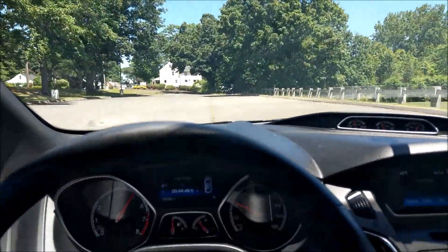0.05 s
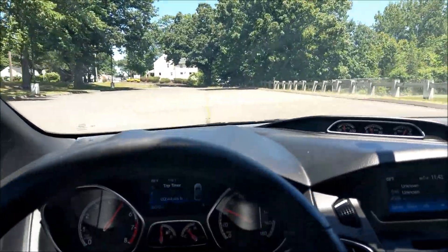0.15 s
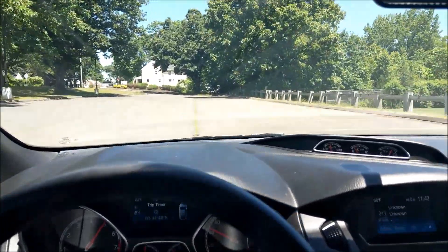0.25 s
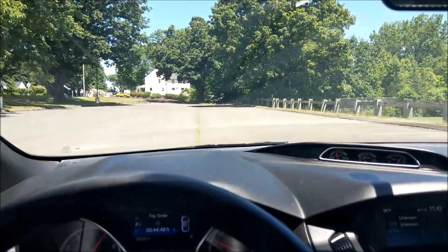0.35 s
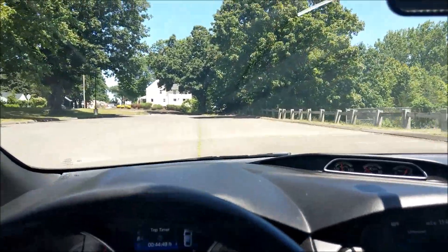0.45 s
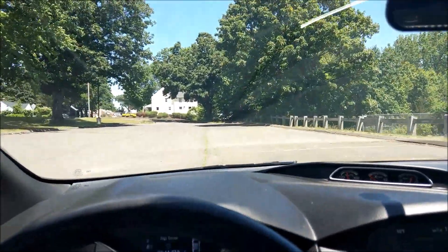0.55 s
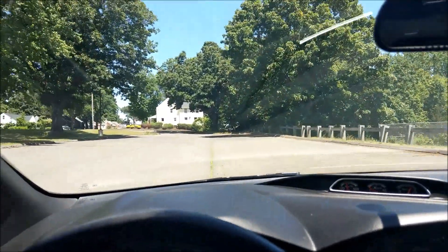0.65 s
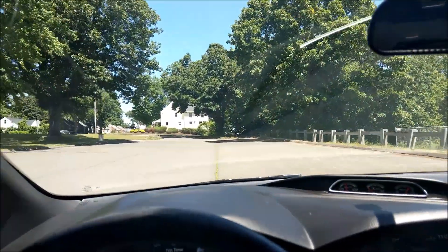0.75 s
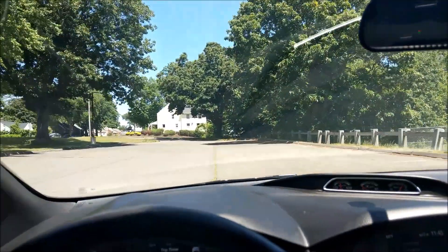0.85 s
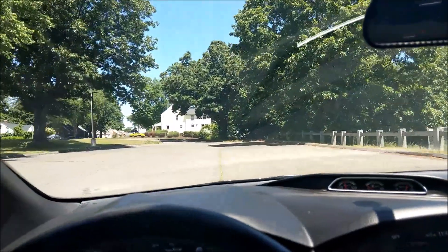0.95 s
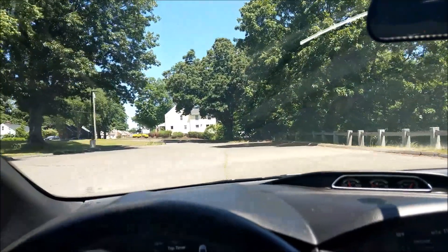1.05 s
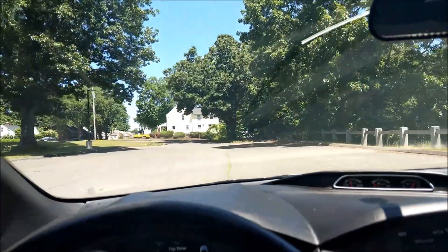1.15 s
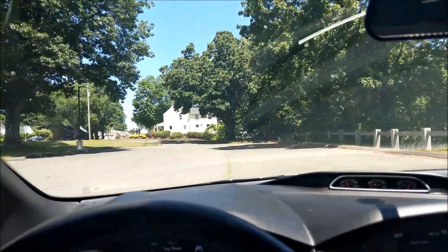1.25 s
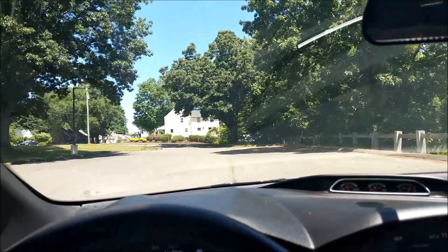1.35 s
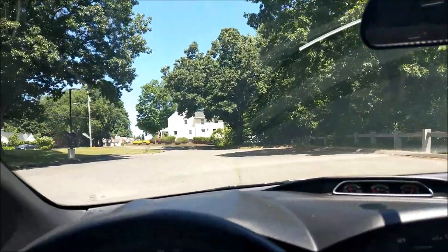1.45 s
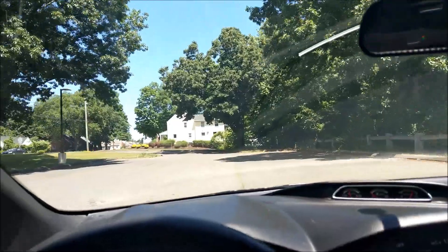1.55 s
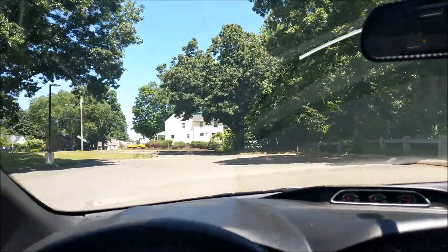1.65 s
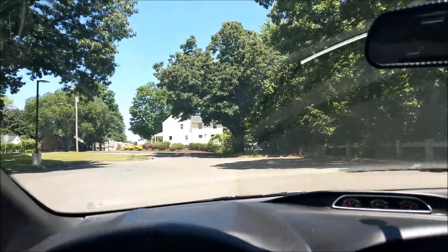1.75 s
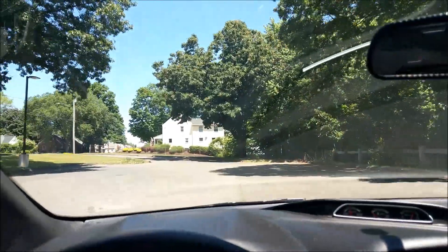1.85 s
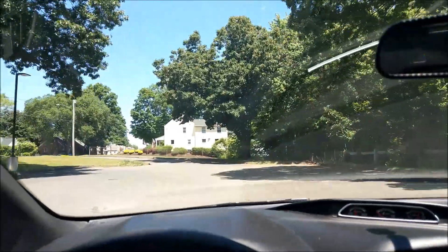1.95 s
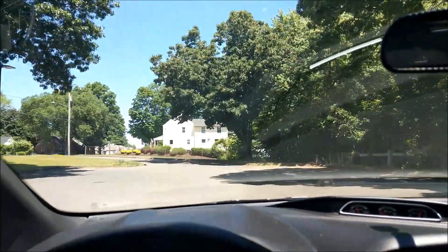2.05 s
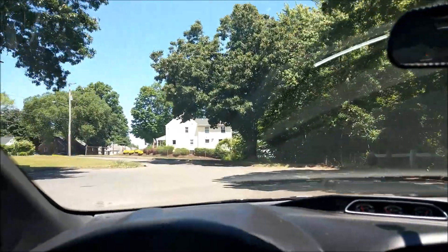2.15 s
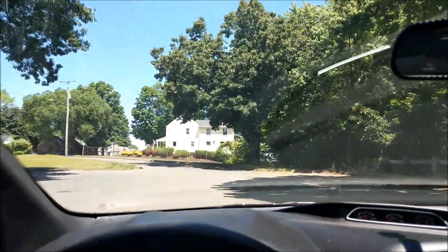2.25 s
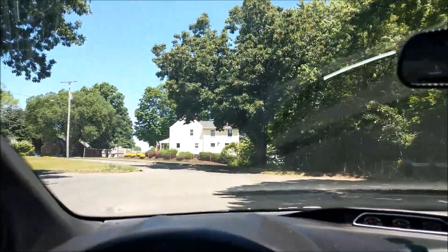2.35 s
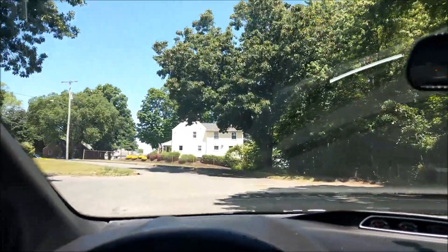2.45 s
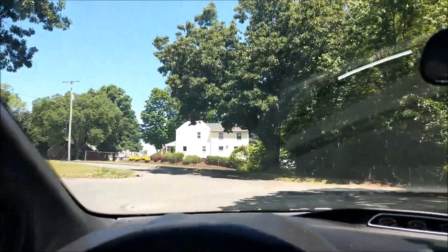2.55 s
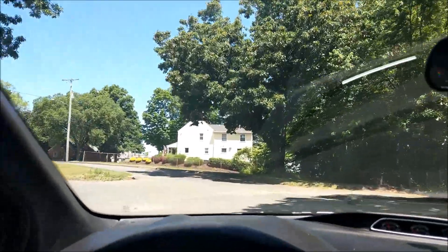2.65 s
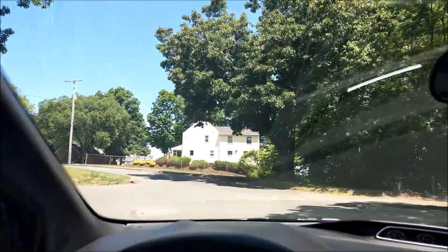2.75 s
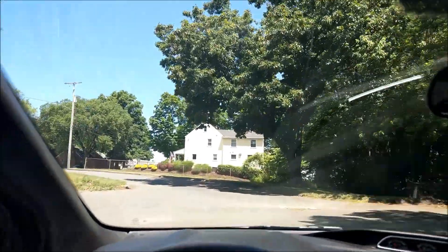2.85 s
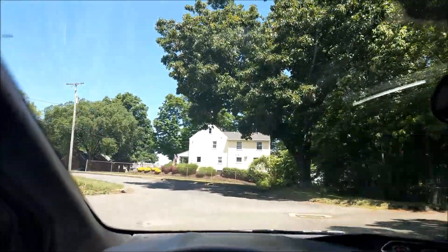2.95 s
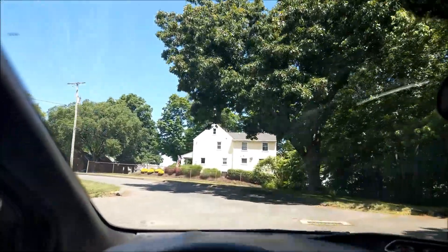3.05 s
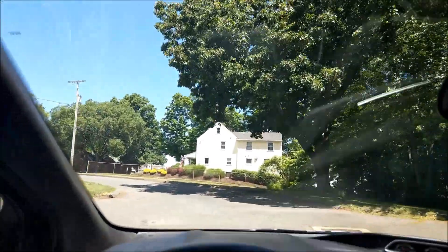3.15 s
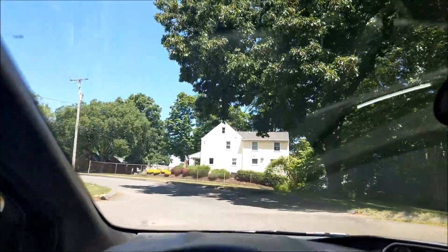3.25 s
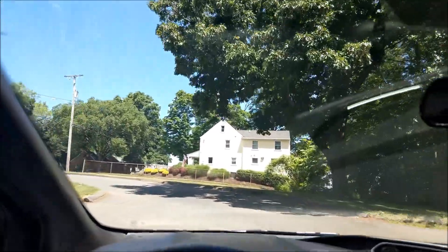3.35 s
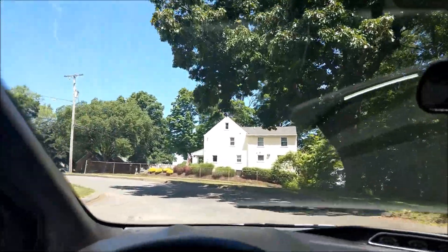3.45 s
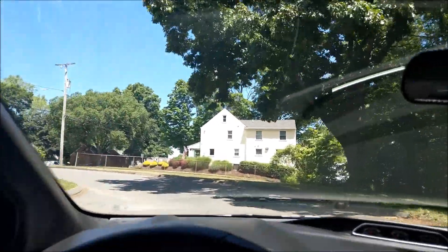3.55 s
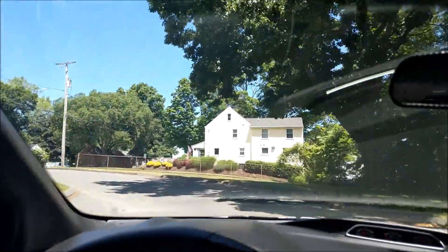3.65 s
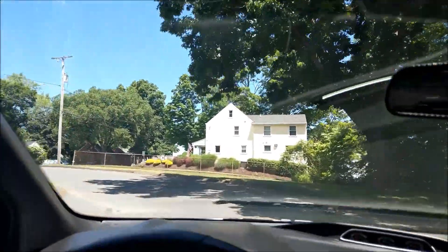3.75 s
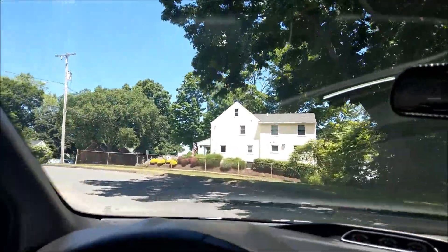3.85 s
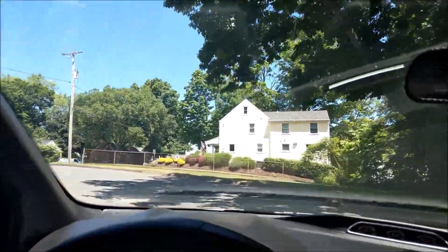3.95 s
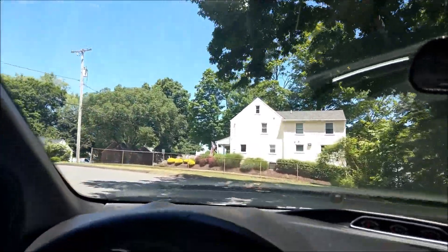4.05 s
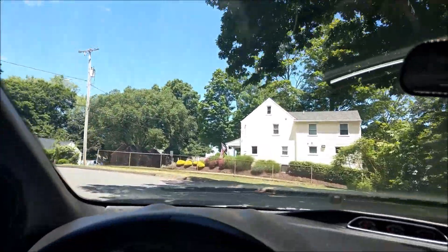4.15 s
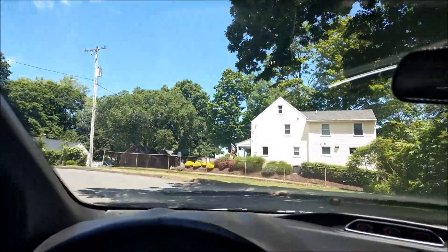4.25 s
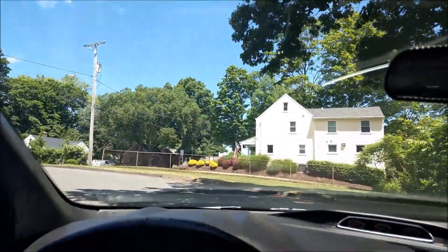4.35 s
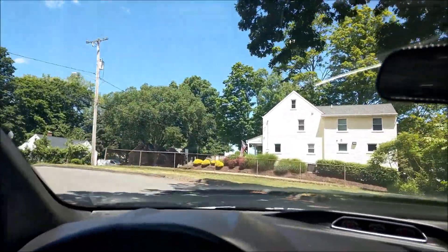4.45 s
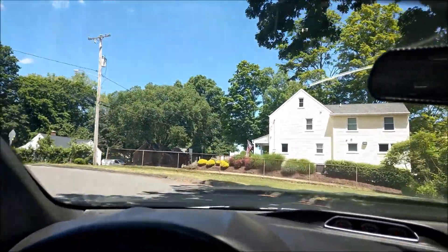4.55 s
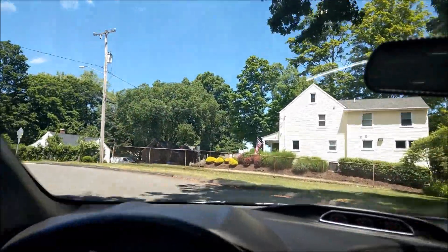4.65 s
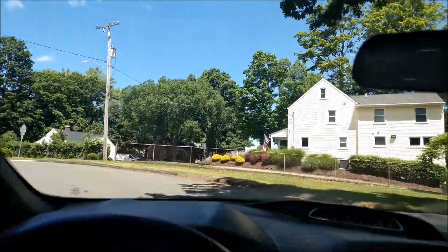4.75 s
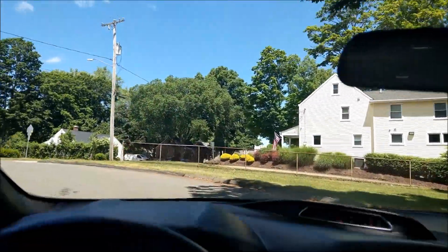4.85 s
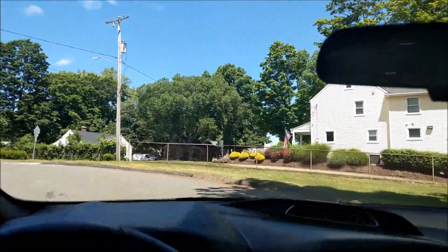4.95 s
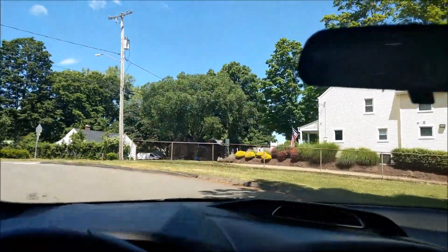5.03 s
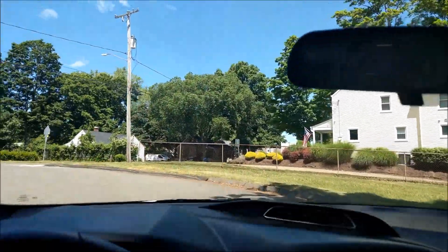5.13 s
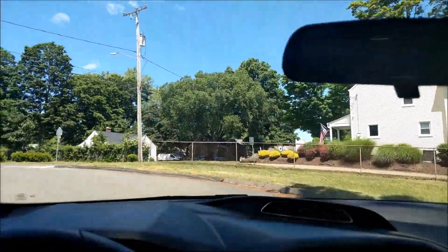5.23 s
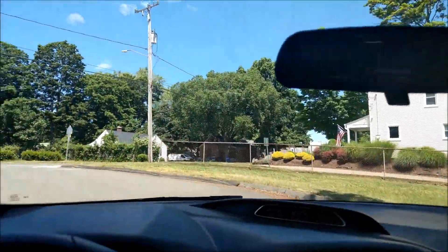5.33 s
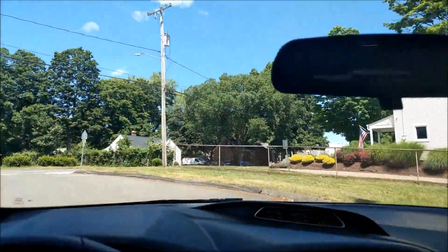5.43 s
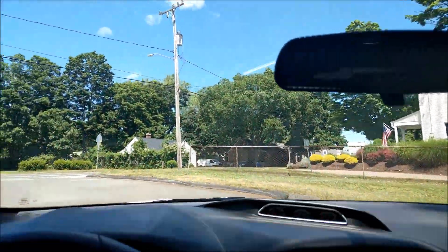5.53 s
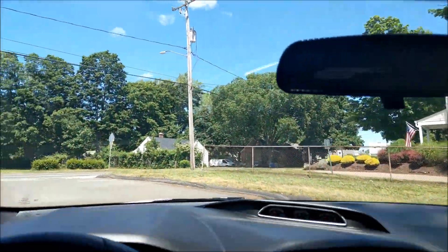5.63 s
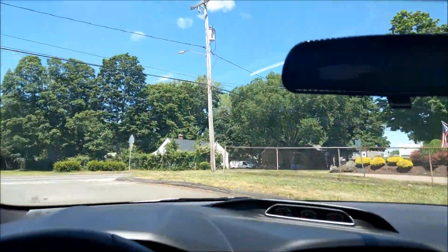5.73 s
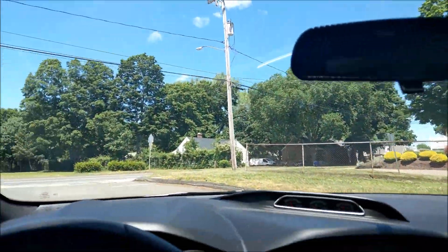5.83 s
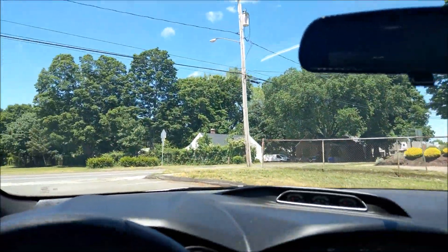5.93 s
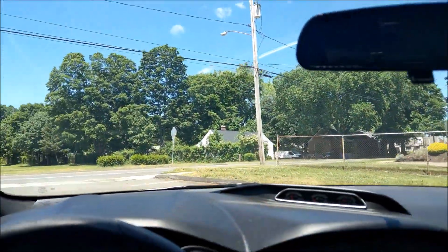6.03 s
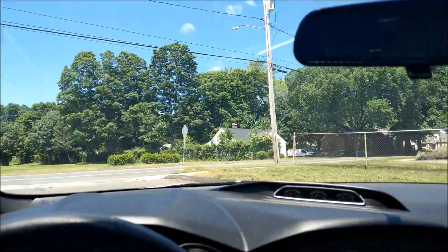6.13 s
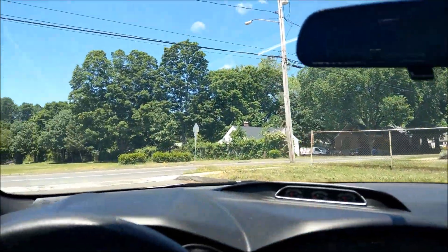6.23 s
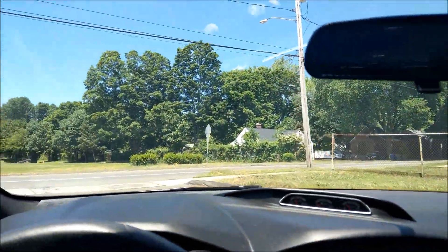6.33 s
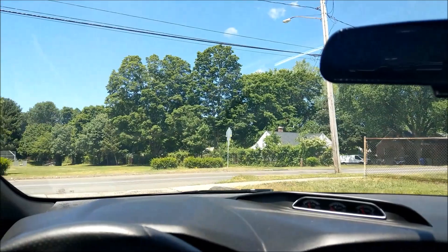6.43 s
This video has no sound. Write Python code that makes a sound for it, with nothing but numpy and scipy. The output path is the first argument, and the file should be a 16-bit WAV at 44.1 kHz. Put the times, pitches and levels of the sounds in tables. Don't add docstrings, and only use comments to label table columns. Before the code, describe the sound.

Heard inside a moving car: a four-cylinder engine pulls hard and raspy for a moment, then the throttle shuts with a small driveline kick and trim knocks. The smoother hum slides steadily lower and quieter as the car coasts down. Tyre rumble and roar swell over bumps, air hisses faintly at the seals, and loose plastic ticks. A close cabin microphone, boomy and dark.

```python
import sys
import numpy as np
from scipy import signal
from scipy.io import wavfile
from scipy.ndimage import uniform_filter1d

SR = 44100
rng = np.random.default_rng(int(sys.argv[2]) if len(sys.argv) > 2 else 0)


def invert_db(x):
    u = np.asarray(x, float) / 20
    return 10 ** u


def unload_audio(sound):
    columns = np.transpose(np.atleast_2d(sound))
    steps = np.round(np.clip(columns, -1, 1) * 32767)
    wavfile.write(sys.argv[1], SR, steps.astype(np.int16))


N = 286209
SEC = np.arange(N) / SR
CLOCK_STEP = 8
LEAD = 400


def evened(x):
    return x / np.sqrt(np.mean(x ** 2) + 1e-20)


def peaked(x):
    return x / np.sqrt(uniform_filter1d((x ** 2).mean(0), size=132).max())


def read(points, hz):
    f, value = np.transpose(points)
    return np.interp(np.log(hz + 1), np.log(f + 1), value)


def columns(rows, t):
    s, *values = np.transpose(rows)
    return [np.interp(t, s, v) for v in values]


def swells(rows, t):
    s, length, *db = np.transpose(rows)
    return np.array(db) @ np.exp(-((t - s[:, None]) / length[:, None]) ** 2)


def drift(t, hz):
    return np.interp(t * hz, np.arange(200), rng.standard_normal(200))


def ring(x, hz, width):
    r = np.exp(-np.pi * width / SR)
    pole = r * np.exp(2j * np.pi * min(hz, 15000) / SR)
    return 2 * signal.lfilter([1 - r], [1, -pole], x + 0j).real


def add(mix, s, sound):
    at = round(s * SR)
    sound = sound[:, max(-at, 0):]
    part = mix[:, max(at, 0):][:, :sound.shape[1]]
    part += sound[:, :part.shape[1]]


# freq_hz, likeness (1 = same)
LIKENESS = [(25, 0.998), (60, 0.996), (130, 1), (280, 0.9), (620, 0.91), (1340, 0.46), (2910, 0.25),
            (6310, 0), (13700, 0.3)]
# freq_hz, left_minus_right_db
BALANCE = [(60, .55), (180, 0.65), (320, -1.4), (530, 1.2), (1560, -.5), (4630, 1), (8500, 2.5),
           (13700, -.5)]


def sides(hz):
    return invert_db(np.outer([.5, -.5], read(BALANCE, hz)))


def noise(spectrum, band_hz, size, patchy_db, flicker_db, patch=(2, 14)):
    hop = size // 4
    frames, hz = N // hop + 5, np.fft.rfftfreq(size, 1 / SR)
    a, b, c, d, patches = rng.standard_normal((frames, len(hz), 5)).T
    patches = uniform_filter1d(patches, size=patch[0], axis=0)
    patches = evened(uniform_filter1d(patches, size=patch[1], axis=1))
    flicker = evened(uniform_filter1d(rng.standard_normal(frames), size=3))
    same = np.clip(read(LIKENESS, hz), -1, 1)[:, None]
    left = a + 1j * b
    z = np.array([left, same * left + np.sqrt(1 - same ** 2) * (c + 1j * d)])
    colour_db = np.where(hz < spectrum[-1][0], read(spectrum, hz), -120)
    z *= invert_db(colour_db[:, None] + patchy_db * patches + flicker_db * flicker)
    z *= sides(hz)[:, :, None]
    inside = (hz > band_hz[0]) & (hz < band_hz[1])
    power = (abs(z.mean(0)) ** 2).mean(1)
    x = signal.istft(z, nperseg=size, noverlap=size - hop)[1][:, :N]
    return x / np.std(x.mean(0)) * np.sqrt(power.sum() / power[inside].sum())


# time_s, pull (0-1)
THROTTLE = [
    (0, 0.8),
    (.05, 0.99),
    (.255, 0.85),
    (.285, 0.83),
    (.42, 0.58),
    (.48, 0.31),
    (.6, 0.02),
    (6.5, 0),
]


def load(t):
    shut_s, fall_s, share = 0.27, 0.0077, 0.41
    cut = share / (1 + np.exp(np.clip((shut_s - t) / fall_s, -50, 50)))
    return columns(THROTTLE, t)[0] * (1 - cut)


# time_s, firing_hz
REVS = [(0, 158.7), (.05, 167.8), (.14, 170.7), (.25, 167.4), (.31, 160.7), (.55, 163.8), (.8, 164.9),
        (1.25, 156.8), (1.67, 149.3), (2.2, 138.2), (2.8, 122), (3.35, 107), (3.85, 95.43), (4.5, 84),
        (5.03, 75.87), (5.31, 73.8), (5.8, 62.55), (6.49, 48.28)]


def by_speed(law, t):
    cruise_db, slope, pull_db = law
    cruise_hz = 160
    slowing_db = 20 * np.log10(columns(REVS, t)[0] / cruise_hz)
    return cruise_db + slope * slowing_db + pull_db * columns(THROTTLE, t)[0]


# freq_hz, width_hz, gain_db (minus = cancelling paths)
SHELL = [(84, 37, 10.5), (114.71, 23.2, 9), (133.05, 41.4, 24), (157.6, 4.7, -19.5), (165.7, 5.7, -8),
         (210, 19, -1.5), (255, 29, -3.5), (275.2, 5.7, 14), (291.5, 4.7, 10), (350, 9.2, -0.5),
         (330.1, 4.4, -10.5), (282, 6, -7), (480, 55, 5.5), (71.5, 5.8, -10), (59.6, 18, -5.5),
         (569.3, 15, 5), (266.5, 24, 6.5)]


def shell(hz, paths=SHELL):
    return sum(db / (1 + (2 * (hz - f) / w) ** 2) for f, w, db in paths)


def tone(turns, hz, db):
    spread = np.clip((hz / 600) ** 2, 0, .8) * rng.uniform(-1.3, 1)
    phase = 2 * np.pi * (turns + rng.random())
    return np.sqrt(2) * invert_db(db) * sides(hz) * np.sin([phase + spread, phase - spread])


# multiple, pulling_db, coasting_db, slope (dB lost per dB of revs), waver_db
FIRING = [
    (1, -40.5, -45.5, 1.0, .8),
    (2, -28, -45.5, 2.6, .9),
    (3, -53, -58, 1.0, 1.8),
]
# multiple (of the firing rate), pulling_db, coasting_db
UNEVEN = [(0.251, -47.5, -43.5), (.5, -39.5, -58.5), (.75, -55, -52.5), (1.251, -75.5, -66.5),
          (1.5, -44.5, -63.5), (1.751, -26.5, -68), (2.251, -35.5, -79), (2.5, -32, -66.5),
          (2.752, -52, -65), (3.252, -45, -82.5), (3.5, -42.5, -61.5), (3.748, -49.5, -73.5), (4, -42, -64),
          (4.25, -55, -79), (4.5, -73.5, -64.5), (4.75, -59, -67), (5.001, -57, -61), (5.5, -76, -62),
          (6, -59.5, -69.5)]
# freq_hz, width_hz, gain_db (minus = cancelling paths)
PIPE = [(270, 40, 17), (306, 13, -10), (332, 28, 11), (395, 40, -5), (458, 50, 8), (487.5, 5, -14),
        (496, 8, 6), (507, 10, 4), (574, 16, 11)]
# time_s, length_s, firing_tone_db, overtones_db
LIFT_OFF = [
    (.28, 0.052, 15.5, 2),
    (.315, 0.05, -4, 8),
]


def engine():
    t = SEC[::CLOCK_STEP]
    hz = columns(REVS, t)[0]
    turns = np.cumsum(hz) * CLOCK_STEP / SR
    pull = load(t)
    firing_kick_db, overtone_kick_db = swells(LIFT_OFF, t)
    out = 0
    for k, pull_db, coast_db, slope, waver_db in FIRING:
        db = by_speed((coast_db, slope, pull_db - coast_db), t) + waver_db * drift(t, 9)
        db += shell(k * hz, PIPE if k == 3 else SHELL)
        if k != 2:
            db += overtone_kick_db if k > 1 else firing_kick_db
        out += tone(k * turns, k * hz, db)

    slowing_db = 24 * np.log10(hz / 160)
    for k, pull_db, coast_db in UNEVEN:
        boom_db = 14 / (1 + (2 * (k * hz - 117) / 30) ** 2)
        coasting_db = coast_db + slowing_db + boom_db + 2.5 * drift(t, 5)
        if 2 < k < 3:
            coasting_db += 0.8 * shell(k * hz)
        if k > 3:
            coasting_db += 0.7 * shell(k * hz, PIPE)
        db = pull * pull_db + (1 - pull) * coasting_db
        if round(4 * k) % 4 == 0:
            db += overtone_kick_db
        out += tone(k * turns, k * hz, db + 0.92 * drift(t, 8.2))
    return signal.resample_poly(out, CLOCK_STEP, 1, axis=1, padtype="line")[:, :N]


# freq_hz, density_db (per Hz)
RASP = [(220, -41), (320, -2.5), (480, -9.5), (620, -4), (720, -11), (900, -22)]


def intake():
    turns = np.cumsum(columns(REVS, SEC)[0]) / SR / 2
    depth = .85
    gulps = evened(1 - depth + depth * np.cos(np.pi * (turns + 0.068)) ** 4)
    rasp = noise(RASP, (220, 900), size=1024, patchy_db=2, flicker_db=1.5)
    return invert_db(-37) * load(SEC) ** 2 * gulps * rasp


def steadied(x):
    share = .45
    power = uniform_filter1d(uniform_filter1d((x ** 2).mean(0), size=2000), size=2000)
    return np.std(x) * evened(x / (power + 1e-6) ** (share / 2))


# freq_hz, density_db (per Hz)
THUD = [(4, -3.5), (8, -13), (14, -14), (22, 3), (33, -15), (46, -4), (58, -15), (70, -21.5), (85, -26)]
# freq_hz, density_db (per Hz)
DRONE = [(45, -35), (70, -14.5), (95, -5.5), (108, -3), (115, -1.5), (123, 2.5), (133, -6), (148, -9.5),
         (165, -13), (185, -14), (200, -50)]
# freq_hz, density_db (per Hz)
HUM = [(140, -22), (180, -9), (200, -7), (213, -2.5), (222, 0.5), (231, -6), (250, -12.5), (290, -16),
       (340, -20.5), (420, -21.5), (465, -21.5), (520, -31.5)]
# freq_hz, density_db (per Hz)
ROAR = [(200, -24.5), (280, 9), (430, 2), (465, 4), (500, 2), (560, 1.5), (690, -1), (780, 4), (870, -3.5),
        (1050, -1.5), (1300, -7), (1550, -13), (2300, -20), (3300, -29)]
# time_s, length_s, suspension_db, cabin_db
BUMPS = [(0, 0.13, 14.5, 5), (.27, 0.17, -3.5, -3), (.5, 0.098, 6.5, 1), (.56, 0.057, -2, 2.5),
         (.72, 0.15, 0, -0.5), (.87, 0.06, -2, -1.5), (.99, 0.079, 3, 3), (1.18, 0.11, -8, 6),
         (1.35, 0.22, 3.5, 2), (1.55, 0.088, 1.5, 0.5), (1.7, 0.15, 5, 3), (1.98, 0.1, 2, 4.5),
         (2.06, 0.049, 4.5, 1), (2.17, 0.073, 9, 2.5), (2.36, 0.077, 7, 5.5), (2.6, 0.09, -2.5, 3),
         (2.76, 0.12, 7, 0), (3.03, 0.15, 3, 6), (3.25, 0.11, 3.5, 1.5), (3.5, 0.055, -2, 5),
         (3.65, 0.059, 0, 1), (3.76, 0.068, 0.5, -1), (3.86, 0.032, 6.5, 7.5), (4.1, 0.17, -2, 4),
         (4.5, 0.079, 2.5, 4.5), (4.72, 0.085, -1, 3.5), (5.15, 0.31, -0.5, 4.5), (4.9, 0.039, 3.5, -4),
         (5.35, 0.17, 2, -3.5), (5.5, .06, -6, 3.5), (5.68, 0.032, -14, 7.5), (5.8, 0.72, -1, -2),
         (6.03, 0.076, 3, 2.5), (6.18, 0.089, 4, 0), (6.4, 0.038, -5, -2.5)]


def road():
    t = SEC[::CLOCK_STEP]
    jolt_db, boom_db = [np.interp(SEC, t, v) for v in swells(BUMPS, t)]
    thud = noise(THUD, (8, 65), size=8192, patchy_db=.8, flicker_db=.5)
    thud *= invert_db(by_speed((-32.5, 0.91, 0), SEC) + jolt_db)
    drone = steadied(noise(DRONE, (60, 180), size=8192, patchy_db=.3, flicker_db=.3))
    drone *= invert_db(by_speed((-37.5, 0.43, 3.6), SEC) + boom_db)
    hum = steadied(noise(HUM, (180, 250), size=8192, patchy_db=.5, flicker_db=1.2))
    hum *= invert_db(by_speed((-41.5, 0.84, 0), SEC) + 0.73 * boom_db)
    roar = noise(ROAR, (700, 1500), size=2048, patchy_db=1.8, flicker_db=.6)
    roar *= invert_db(by_speed((-51.5, 1.58, 2.8), SEC))
    return thud + drone + hum + roar


# freq_hz, density_db (per Hz)
HISS = [(900, -13), (1700, 5), (2500, 3.5), (3400, -0.5), (5200, -2.5), (7800, -3), (9000, -8.5),
        (9600, -17.5), (12000, -17.5), (14300, -31)]
# time_s, length_s, swell_db
GUSTS = [(0, 0.14, -0.5), (.56, 0.07, 4.5), (2.95, 0.13, -3), (3.22, 0.17, 0.5), (3.42, 0.087, 0.5),
         (3.6, 0.22, -3.5), (3.9, 0.064, 3), (4.2, 0.091, 4.5), (4.36, 0.068, -4), (4.65, 0.018, 2),
         (4.86, 0.061, 5), (5.05, 0.17, 2)]


def wind():
    level_db = by_speed((-67.5, 1.32, 2.9), SEC) + swells(GUSTS, SEC)[0]
    hiss = noise(HISS, (2500, 9000), size=256, patchy_db=2.0, flicker_db=1.5, patch=(5, 40))
    return invert_db(level_db) * hiss


def scrape(rise, t60, alike):
    t = np.arange(-LEAD, 5000) / SR
    after = np.maximum(t, 0)
    creep = invert_db(-10.0 + 1800 * np.minimum(t, 0) - 760 * after)
    creep *= np.minimum((t - t[0]) / .002, 1)
    rattle = invert_db(-26.0 - 60 * after / 0.56)
    blow = (1 - np.exp(-after / rise)) ** 2 * (invert_db(-60 * after / t60) + rattle)
    shared, *own = rng.standard_normal((3, len(t)))
    return (creep + blow) * (alike * shared + np.sqrt(1 - min(alike, 1) ** 2) * np.array(own))


# start_s, peak_db, treble_db, ring_hz
TICKS = [(0.059, -44, -16.5, 2300), (0.1839, -27.5, -17.5, 2625), (0.1992, -42.5, -32, 2580),
         (0.236, -41, -27, 3020), (0.284, -39, -34, 2780), (0.363, -43.5, -32, 2850),
         (0.4121, -34, -18, 2720), (0.461, -45.5, -15, 2774), (0.543, -44, -15.5, 2280),
         (.569, -60, -11.5, 2560), (0.8474, -47.5, -13, 2860), (1.0844, -45.5, -18, 2676),
         (1.1683, -46.5, -13, 3192), (1.32, -44.5, -13.5, 2554), (1.6753, -46, -12, 2660),
         (2.0292, -45, -13, 2610), (2.1274, -38.5, -12.5, 2180), (2.4374, -48.5, -9, 2340),
         (2.5855, -47.5, -12, 2221), (2.7168, -51.5, -8, 2329), (2.741, -47, -21.5, 2710),
         (2.795, -46, -21.5, 2700), (2.8171, -49, -7, 2320), (2.895, -45.5, -20, 2375),
         (3.255, -36.5, -13.5, 2844), (3.326, -46.5, -22, 2900), (3.4156, -38.5, -9, 2400),
         (3.6401, -45, -18, 2760), (3.8035, -52, -21, 2806), (3.8684, -46, -17.5, 2869),
         (3.475, -47.5, -25, 2470), (4.1415, -52, -12, 2860), (4.158, -53, -16.5, 2850),
         (4.213, -60.5, -15, 2697), (4.251, -48, -12.5, 2803), (4.277, -58, -13.5, 2600),
         (4.62, -62, -34, 2230), (4.646, -58, -24, 2280), (4.672, -61, -31, 2630), (5.242, -58, -15, 2773),
         (5.7693, -63, -30, 2753), (5.855, -57, -20, 2756), (5.899, -57, -32, 2276)]
# start_s, peak_db
FLICKS = [(0.134, -56), (.175, -42), (0.761, -57), (.842, -53), (.872, -52), (0.909, -53.5), (0.937, -50),
          (1.611, -56.5), (1.77, -56.5), (1.8, -54.5), (1.885, -57.5), (1.9798, -59.5), (2.0002, -54.5),
          (2.3017, -55.5), (2.3811, -55.5), (2.4173, -52.5), (2.5024, -58), (2.607, -57.5), (2.6534, -55),
          (3.1633, -51.5), (3.181, -55), (3.35, -52.5), (3.833, -58), (3.99, -55.5), (4.144, -63),
          (4.4186, -61), (4.447, -52.5), (5.099, -51.5), (5.2482, -55.5)]
# freq_hz, width_hz, level_db
TRIM = [(7300, 2700, 8.5), (11200, 1200, -9.5), (5730, 2900, 6)]


def ticks():
    out = np.zeros((2, N))
    flicks = [(s, db, -8.5, 2790) for s, db in FLICKS]
    for s, db, treble_db, hz in TICKS + flicks:
        pan_db = 4 * rng.uniform(-1.3, 1.4)
        chatter = scrape(rise=0.00084, t60=0.052, alike=0.96)
        chatter[:, LEAD + 80] += 4.5
        panel = 0.6 * ring(chatter, .66 * hz, 220)
        panel += ring(chatter, hz, 270)
        panel += 0.4 * ring(chatter, 1.45 * hz, 570)
        chatter = scrape(rise=0.001, t60=0.039, alike=0.079)
        fizz = sum(invert_db(g) * ring(ring(chatter, f, w), f, w) for f, w, g in TRIM)
        sound = peaked(ring(panel, hz, 4500)) + invert_db(treble_db + 13.0) * peaked(fizz)
        level_db = db - 13.0 + np.array([[.5], [-.5]]) * pan_db
        add(out, s - LEAD / SR - .0015, invert_db(level_db) * sound)
    return out


# start_s, peak_db, ring_hz, t60_s
PINGS = [(.1835, -66, 11400, .02), (.187, -50, 2550, .04), (.187, -47, 3900, .03), (.246, -41, 606, .04),
         (.25, -49, 720, .03), (.285, -47, 1720, .04), (.4115, -50, 2700, .04), (.4115, -62, 11000, .015),
         (.850, -57, 2900, .03), (.854, -55, 2770, .04), (.856, -53, 2060, .05), (.862, -57, 2080, .03),
         (.870, -53, 1890, 0.027), (.874, -65, 6200, 0.017), (1.673, -69, 11200, .015),
         (2.031, -73, 11200, .015), (2.1275, -54, 11300, .012), (2.134, -62.5, 7400, 0.041),
         (2.717, -71, 11200, 0.017), (3.162, -62.5, 11000, .015), (3.248, -60, 4200, .04),
         (3.254, -62, 10300, 0.019), (3.255, -56, 4100, 0.026), (3.256, -57, 4860, .025),
         (3.328, -60, 3000, .03), (3.255, -57, 2900, .025), (3.257, -48, 1660, .05),
         (3.417, -59.5, 10300, .025), (3.418, -55, 1220, 0.035), (3.418, -58, 2260, .02),
         (3.416, -60.5, 7500, .02), (3.418, -60, 4300, .04), (3.527, -62, 700, .03),
         (3.64, -69, 5000, 0.027), (3.64, -72.5, 11500, 0.014), (4.369, -56, 689, 0.028),
         (4.445, -72, 10900, .015), (4.778, -51, 720, .03), (5.098, -56, 1900, .04),
         (5.099, -76, 2800, .04), (5.19, -52, 704, 0.027), (5.245, -58, 2190, .04),
         (5.245, -64, 2840, 0.033), (5.248, -46.5, 629, 0.046), (5.553, -56, 710, .03),
         (5.768, -58.5, 2700, 0.026), (5.898, -67, 2400, 0.031), (6.256, -57, 900, .03),
         (6.332, -62, 1610, .03)]


def pings():
    out, t = np.zeros((2, N)), np.arange(2000) / SR
    for s, db, hz, t60 in PINGS:
        touches = 0.16 * invert_db(-60 * t / 0.027) * rng.standard_normal((2, len(t)))
        touches[:, 0] += 1
        side = invert_db(np.array([[.5], [-.5]]) * rng.uniform(-5, 1))
        mode = ring(ring(touches, hz, 3.0 / t60), hz, .5 * hz)
        add(out, s, invert_db(db) * side * peaked(mode))
    return out


# start_s, peak_db,
# low_ring_hz, high_ring_hz
KNOCKS = [(0.198, -28.5, 719, 2186), (0.243, -40.5, 600, 720), (0.288, -39, 820, 1710),
          (0.411, -30, 1000, 2000), (0.521, -35, 684, 2400), (0.547, -42, 930, 2340),
          (0.849, -38, 1028, 1987), (2.128, -34.5, 744, 1610), (3.245, -43, 704, 2290),
          (3.256, -39, 885, 1688), (3.313, -40, 1235, 2268), (3.415, -30, 1160, 2193),
          (3.526, -58, 720, 1600), (3.876, -38.5, 1070, 1631), (3.888, -39, 952.4, 1563),
          (4.146, -39, 786, 1803), (4.369, -62, 749, 1600), (4.778, -64, 749, 1607),
          (5.096, -46, 727.4, 1740), (5.19, -52, 780, 1497), (5.244, -44.5, 1150, 2147),
          (5.378, -47.5, 697.3, 1726), (5.553, -43, 759.7, 1870), (5.563, -48, 1170, 2099),
          (5.768, -45, 945, 2750), (5.81, -52, 897, 1580), (5.898, -48, 742, 1596), (6.259, -46, 811, 1869),
          (6.286, -52, 829.8, 2296), (6.331, -46, 836, 1571)]


def knocks():
    out = np.zeros((2, N))
    for s, db, low_hz, high_hz in KNOCKS:
        chatter = scrape(rise=0.0027, t60=0.066, alike=0.72)
        chatter[:, LEAD + 120] += 9
        panel = 1.3 * ring(chatter, 620, 160)
        panel += ring(chatter, low_hz, 240)
        panel += invert_db(-5.5) * ring(chatter, high_hz, 200)
        panel += 0.082 * ring(chatter, 1.2 * high_hz, 700)
        add(out, s - LEAD / SR - .0015, invert_db(db - 11.0) * peaked(ring(panel, 1100, 2000)))
    return out


# start_s, length_s, level_db, first_hz, last_hz
MOANS = [(0.48, 0.17, -46, 120, 107), (1.15, 0.18, -40, 226, 223.5), (2.95, 0.34, -46.5, 216, 209.7),
         (3.27, .32, -44, 278, 230.6), (3.45, 0.17, -42.5, 210, 215.2), (3.78, .32, -43, 118, 135.1),
         (4.4, 0.47, -40.5, 126, 117), (4.7, .3, -49.5, 222, 210.4), (5.05, 0.14, -41, 146, 150.4),
         (5.6, 0.13, -48.5, 225, 226), (5.95, 0.18, -49, 215, 220.5)]


def moans():
    out = np.zeros((2, N))
    for s, length, db, first_hz, last_hz in MOANS:
        u = np.linspace(0, 1, round(length * SR))
        turns = np.cumsum(first_hz + (last_hz - first_hz) * u) / SR + rng.random()
        moan = np.sqrt(2) * np.sin(np.pi * u) * np.sin(2 * np.pi * turns)
        add(out, s, invert_db(db) * moan * invert_db([[.3], [-.3]]))
    return out


def squeak():
    start_s, length_s, level_db, low_hz, top_hz = 3.285, 0.25, -67.5, 3950, 4800
    arch = np.sin(np.pi * np.linspace(0, 1, round(length_s * SR)) ** 0.7)
    fuzz = [evened(uniform_filter1d(v, size=150)) for v in rng.standard_normal((2, len(arch)))]
    whistle = np.sin(2 * np.pi * np.cumsum(low_hz + (top_hz - low_hz) * arch) / SR)
    out = np.zeros((2, N))
    add(out, start_s, invert_db(level_db) * np.sqrt(arch) * np.array(fuzz) * whistle)
    return out


def scene():
    moving = engine() + intake() + road() + wind()
    return moving + ticks() + pings() + knocks() + moans() + squeak()


def band_limit(x):
    return signal.sosfilt(signal.butter(12, 14320, fs=SR, output="sos"), x)


def record(dry):
    shared, *own = rng.standard_normal((3, N))
    hiss = invert_db(-82) * (shared + 1.15 * np.array(own))
    limit = signal.firwin(255, 14250, window=("kaiser", 8), fs=SR)[None]
    opening = 1 - (1 - .35) * np.exp(-SEC / .003)
    mix = opening * signal.oaconvolve(dry + hiss, limit, "same")
    return band_limit(mix)


dry = scene()
out = record(dry)
unload_audio(out)
```